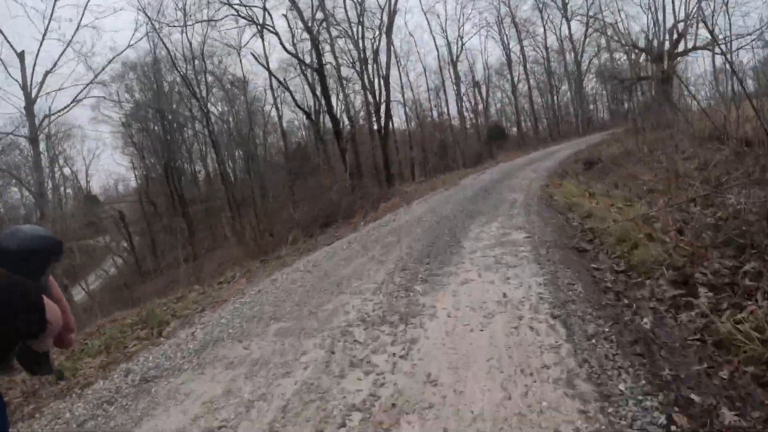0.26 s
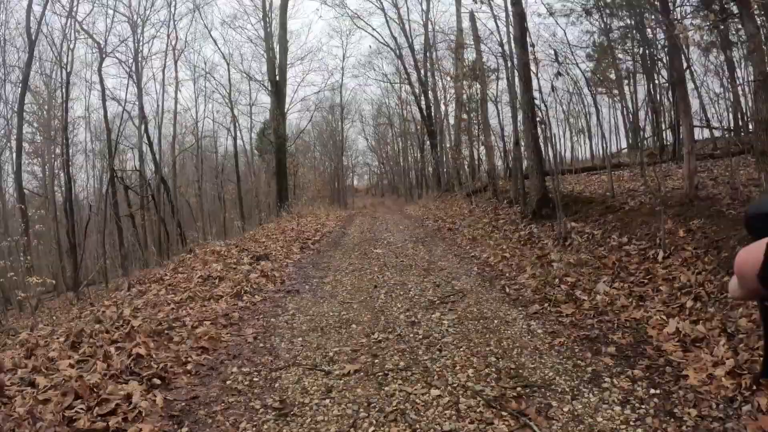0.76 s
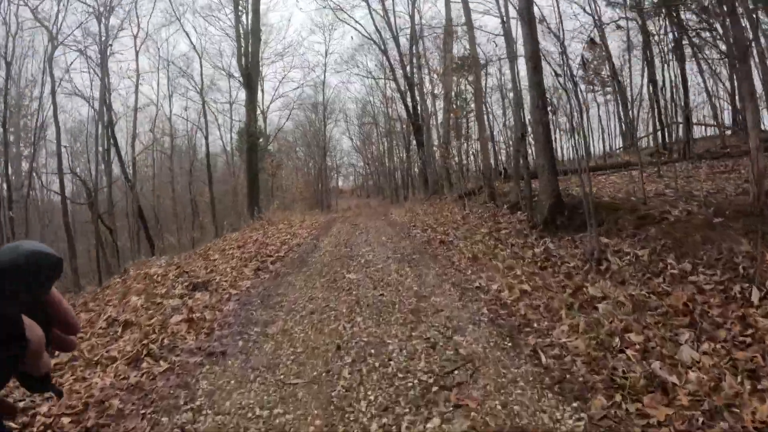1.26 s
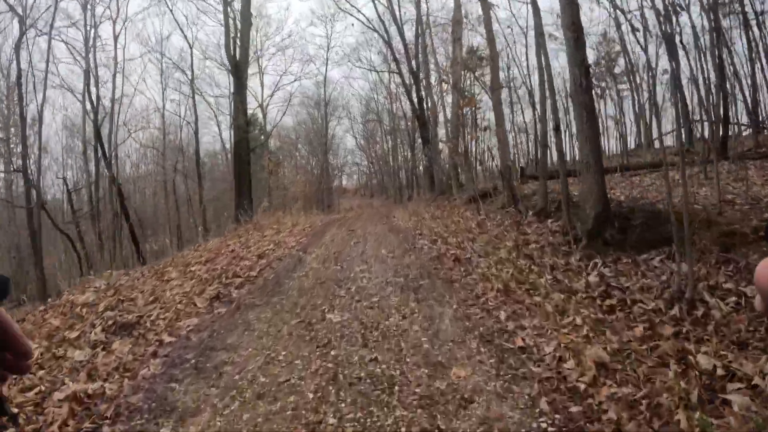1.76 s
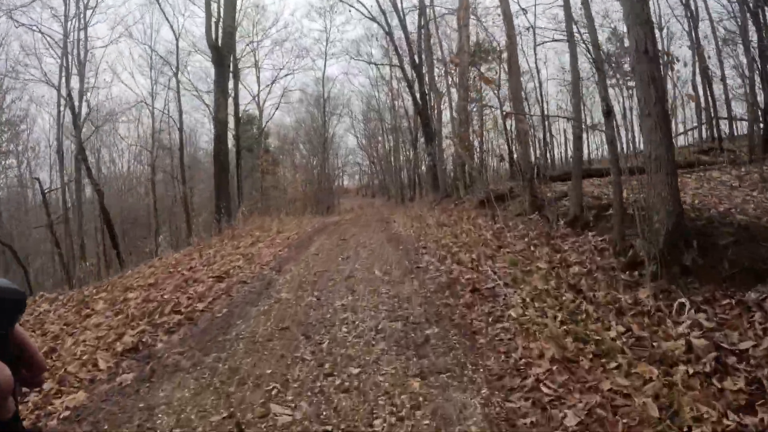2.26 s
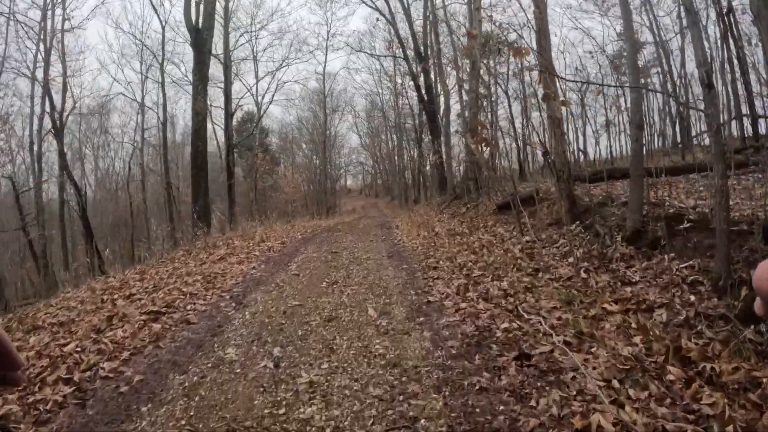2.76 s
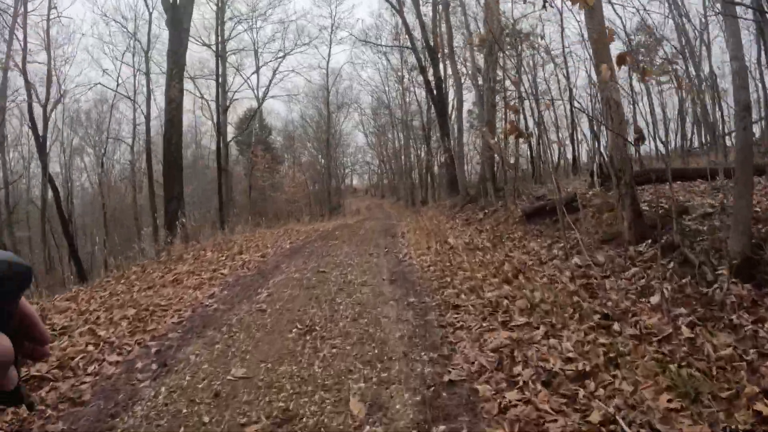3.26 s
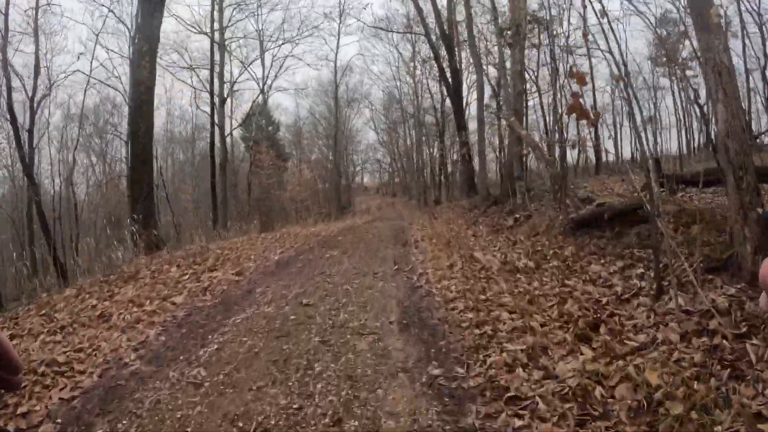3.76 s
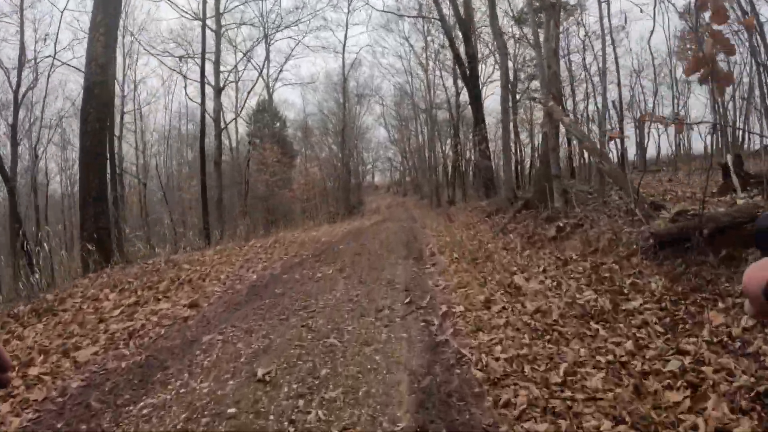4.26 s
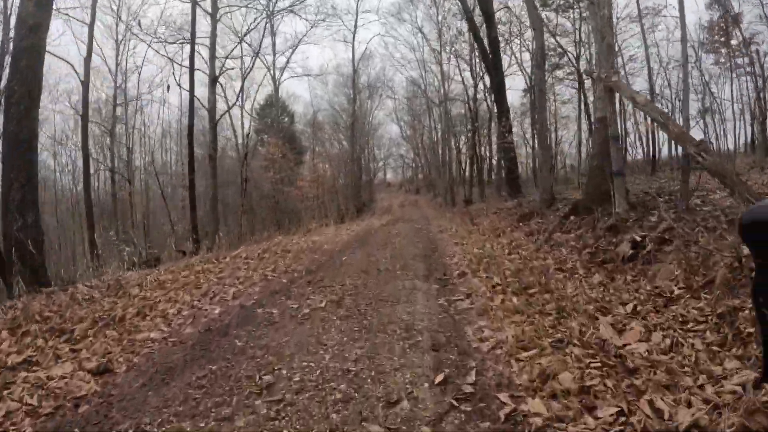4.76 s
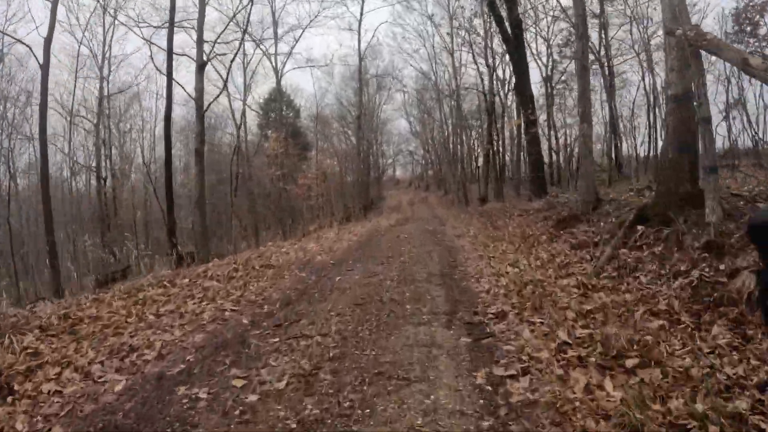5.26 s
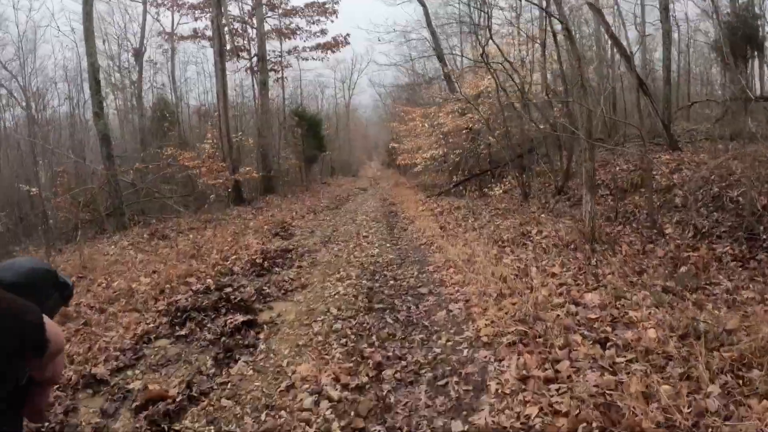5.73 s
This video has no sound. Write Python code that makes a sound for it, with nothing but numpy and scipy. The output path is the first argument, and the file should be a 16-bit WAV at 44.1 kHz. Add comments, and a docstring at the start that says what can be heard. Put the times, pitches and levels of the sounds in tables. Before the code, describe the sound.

Dense gritty rolling under bicycle tyres, harsher and more rattly at first, then softer, patchier and crackling as leaves cover the stones. Scattered sharp pops, clinks, brittle leaf ticks and a few dull thuds stand out, with a strong clack near 4.8 seconds. Wind buffets the nearby microphone in low, uneven swells in the open air, with no noticeable echo.

```python
"""Countless small stones grind and tick under bicycle tyres: noise and short damped tones shaped by the ground.
The wheels roll along a packed gravel road, then a woodland track of loose stones and dry leaves.
Stones pop away as cracks with ringing modes; bumps, judders and knocks are bell-shaped bursts; leaves snap.
Wind buffets the microphone that rides along: noise filtered into large and small eddies, driven by air speed."""
import sys
import numpy as np
from scipy import signal
from scipy.fft import rfft, irfft, next_fast_len
from scipy.io import wavfile
from scipy.ndimage import uniform_filter1d

SR = 44100
rng = np.random.default_rng(int(sys.argv[2]) if len(sys.argv) > 2 else 0)


def dump(signal):
    """Clip the signal to [-1, 1] and save it as 16-bit WAV at the path in sys.argv[1]."""
    limited = np.clip(np.atleast_2d(signal).T, -1, 1)
    pcm = np.round(limited * 32767).astype(np.int16)
    wavfile.write(sys.argv[1], SR, pcm)


N = 264467
T = np.arange(N) / SR
FFT_SIZE = next_fast_len(N)
FFT_HZ = np.fft.rfftfreq(FFT_SIZE, 1 / SR)

# Spectra of wind eddies, shaken frame, packed road and leafy track, then of a stone's crack with its grit,
# gravel crushed by a bump, and a snapping leaf. Each row: frequency in Hz, relative density in dB per Hz.
WIND_SPECTRUM = [(8, 5), (20, 6.5), (31, 4), (50, -6), (75, -6), (100, -13), (125, -8), (170, -22.5),
                 (260, -28), (600, -98.5), (2000, -86)]
FRAME_SPECTRUM = [(70, -38), (105, 5), (122, 3.5), (150, -0.5), (190, 1.5), (235, -3), (305, 0),
                  (400, -7.5), (570, -11.5), (750, -27.5), (1500, -42), (4000, -89)]
ROAD_SPECTRUM = [(400, 15.5), (620, 6.5), (850, 2), (1300, -1.5), (1800, -9.5), (2400, -6.5), (3300, -10),
                 (4500, -23.5), (6300, -33.5), (8500, -37), (10500, -48.5), (13000, -60), (16000, -89)]
TRACK_SPECTRUM = [(400, 1.5), (620, 6.5), (850, -0.5), (1300, 0), (1850, -10), (2800, -1.5), (3300, -4.5),
                  (4200, -14.5), (5500, -24.5), (7000, -28), (8400, -28.5), (9800, -35), (12800, -40.5),
                  (15500, -52)]
CRACK_SPECTRUM = [(150, -13), (400, -23), (1200, 15), (1900, -3.5), (2700, 14.5), (3400, 8), (5000, -28),
                  (8500, -16), (12000, -42), (16000, -73)]
CRUNCH_SPECTRUM = [(120, -22), (330, 19), (600, 5.5), (1250, 3.5), (2000, -5), (3200, -4.5), (5000, -17),
                   (8500, -26), (12000, -43), (16000, -68)]
LEAF_SPECTRUM = [(1500, -48), (4000, 16.5), (6500, 17), (8500, 7), (11000, 0), (15500, -15)]

# Air speed past the microphone. Each row: time in seconds, level in dB.
AIR_SPEED = [(0.0, -21), (0.23, -25.5), (0.5, -24), (0.8, -23.5), (1.4, -24.5), (1.9, -30), (2.8, -28),
             (3.5, -27.5), (4.7, -26.5), (5.3, -25.5), (6.0, -27.5)]
# Gusts and lulls of large eddies. Each row: centre in seconds, change in dB, half-width in seconds.
GUST_SWELLS = [(0.0, -2.5, 0.11), (0.42, 6, 0.22), (1.02, -1, 0.043), (1.25, -5, 0.029), (1.78, 10.5, 0.15),
               (2.05, 8, 0.066), (2.24, -2, 0.072), (2.33, 6.5, 0.077), (2.5, 6.5, 0.028),
               (2.87, -4, 0.031), (3.2, -6.5, 0.16), (3.45, 8.5, 0.093), (3.57, 4.5, 0.056),
               (3.7, -5, 0.054), (3.85, 3, 0.084), (4.5, -7.5, 0.14), (4.78, 2.5, 0.063),
               (4.96, -11, 0.067), (5.27, -3.5, 0.11), (5.87, 6.5, 0.17)]
# The ground under the tyres. Each row: time in seconds, stoniness in dB, loose cover of grit and leaves in dB.
GROUND_COVER = [(0.0, -37, -46), (0.18, -41, -54), (0.26, -37.5, -45.5), (0.37, -34, -42),
                (0.58, -38.5, -40), (0.7, -38.5, -46.5), (0.85, -38, -46.5), (1.12, -36.5, -44.5),
                (1.3, -42, -51.5), (1.6, -39.5, -49), (2.13, -44.5, -55.5), (2.17, -40, -47.5),
                (2.45, -43, -50), (2.7, -44.5, -48.5), (3.08, -45, -49), (3.75, -46.5, -50.5),
                (4.35, -49.5, -50), (4.65, -44.5, -46), (5.0, -49, -49), (5.55, -46.5, -48.5),
                (5.9, -41, -49.5)]
# The tread digs in. Each row: centre in seconds, lift in dB, half-width in seconds.
TREAD_SURGES = [(0.07, -0.5, 0.042), (0.435, 3.5, 0.014), (0.62, 1.5, 0.03), (1.42, 4, 0.094),
                (1.56, 2, 0.018), (1.79, 8.5, 0.051), (2.18, 4, .025), (2.28, 3, 0.038), (2.605, 4, 0.031),
                (3.05, 2.5, 0.046), (3.46, 1.5, 0.061), (3.86, 3, 0.0077), (4.8, 6, 0.022),
                (5.32, 3.5, 0.02), (5.73, 4, 0.024)]
# The tyres skim a smooth spot. Each row: centre in seconds, change in dB, half-width in seconds.
SMOOTH_SPOTS = [(0.783, -2.5, 0.014), (0.845, -2, 0.0091), (1.07, -5.5, 0.022), (1.725, -6, 0.017),
                (2.122, -6, 0.035), (4.27, -3.5, 0.036)]
# Ripples in the ground set the frame juddering.
# Each row: centre in seconds, level in dB, pitch in Hz, half-width in seconds.
FRAME_JUDDERS = [(0.11, -24.5, 73, .05), (0.235, -20, 74.6, 0.058), (0.33, -26.5, 81.6, 0.024),
                 (0.555, -21, 154, 0.01196), (0.41, -27, 145, 0.0203), (0.72, -28, 76, .07),
                 (0.829, -24.5, 131, 0.018), (1.2, -30.5, 79.6, .03), (2.061, -33, 130, 0.02),
                 (2.19, -37.5, 232, .015), (3.48, -36.5, 72, .08), (5.3, -29, 82, 0.057),
                 (5.64, -29, 109, .035), (5.85, -31, 69, .04)]
# Stones pinched out from under a tyre.
# Each row: start in seconds, ring level in dB, pitch in Hz, ring T60 in seconds, rise in seconds.
STONE_POPS = [(0.072, -29, 3400, 0.0045, .0002), (0.3384, -20.5, 2590, 0.0038, 0.0002),
              (0.3396, -29, 3640, 0.011, 0.0004), (0.3555, -19.5, 1000, 0.017, 0.0005),
              (.530, -26, 1060, 0.016, 0.00029), (0.748, -31, 1280, 0.0065, 0.00015),
              (0.821, -27, 1210, 0.0072, 0.00014), (0.867, -25.5, 1010, 0.0021, 0.00009),
              (0.981, -33, 1900, .004, 0.00022), (0.9891, -24, 2000, 0.0042, 0.00015),
              (1.023, -32, 1490, .004, 0.00018), (1.1172, -29, 755, 0.011, 0.0003),
              (1.2485, -32, 686, 0.015, 0.00058), (1.403, -32, 2140, 0.03, 0.00051),
              (1.451, -37, 1040, .004, 0.00024), (1.593, -33, 1330, 0.0031, 0.00013),
              (1.6919, -27, 840, 0.013, 0.00098), (1.87, -34, 660, 0.021, 0.00042),
              (2.3008, -38, 556, 0.02, 0.00061), (2.504, -32.5, 2610, 0.006, 0.0002),
              (2.509, -36, 2700, 0.014, 0.0002), (2.610, -34, 2680, 0.013, 0.00026),
              (2.722, -33, 950, .012, .0007), (2.774, -38, 2700, .008, .0003),
              (2.827, -40, 2900, .006, .0003), (2.849, -40, 2500, .006, .0003),
              (2.9075, -32.5, 756, 0.009, 0.00023), (3.002, -37, 2780, 0.018, 0.00034),
              (3.030, -37, 2720, 0.018, 0.00033), (3.064, -36, 2600, .008, .0003),
              (3.157, -32, 640, .016, .0008), (3.223, -36.5, 2820, .007, .0003),
              (3.387, -36, 950, .009, .0004), (3.505, -37, 2680, .01, .0003),
              (3.571, -35.5, 2600, .006, .0002), (3.59, -32, 1100, .007, .0004),
              (3.653, -28, 2550, 0.0083, .0002), (3.6792, -45, 2900, .006, .0003),
              (3.680, -24, 930, 0.016, 0.00053), (3.687, -31, 750, .012, 0.00083),
              (3.701, -49, 3000, .008, .0003), (3.877, -46, 2780, .006, .0003),
              (3.914, -31, 1020, 0.0018, 0.00014), (4.046, -27.5, 1090, 0.0046, 0.000057),
              (4.2094, -31.5, 1000, 0.009, 0.00016), (4.492, -25.5, 1050, 0.0039, 0.000091),
              (4.4933, -31, 2700, .006, .0002), (4.506, -43, 1300, .005, .0002),
              (4.659, -37, 3120, 0.0055, .0002), (4.7772, -34.5, 1130, 0.0066, 0.00018),
              (4.778, -31, 2430, .008, 0.00034), (4.779, -20.5, 1120, 0.021, 0.001),
              (4.788, -27, 1080, 0.013, .0007), (4.8223, -24, 2720, 0.0063, 0.00032),
              (4.999, -40, 1100, 0.0086, .0004), (5.053, -38, 2780, .008, .0003),
              (5.322, -38, 2920, 0.0089, .0003), (5.4542, -31, 2790, 0.0081, .00026),
              (5.532, -40, 990, 0.0076, 0.00044), (5.632, -34.5, 2520, 0.0072, 0.00027),
              (5.743, -37, 2750, 0.0098, .0003), (5.7985, -26, 1115, 0.015, 0.0012),
              (5.9018, -27.5, 1307, 0.019, 0.0016), (5.9054, -21.5, 1330, 0.0074, 0.0012),
              (5.9676, -31.5, 1800, 0.0041, 0.0003)]
# Stones rolled over against their neighbours.
# Each row: centre in seconds, level in dB, pitch in Hz, half-width in seconds.
STONE_RATTLES = [(0.4, -47, 2100, .1), (0.533, -27, 510, 0.0064), (0.55, -38, 2230, 0.013),
                 (0.61, -48, 2160, 0.032), (1.148, -37, 674, 0.011), (1.556, -36.5, 530, 0.0065),
                 (1.57, -47, 2800, 0.017), (1.66, -49, 2900, 0.028), (1.795, -45.5, 2250, 0.021),
                 (2.303, -43, 590, .007), (2.303, -41.5, 1200, 0.007), (2.597, -37, 455, 0.0071),
                 (2.61, -44, 900, 0.0055), (2.919, -41, 920, 0.0051), (3.05, -52, 2700, 0.031),
                 (3.698, -50, 1200, 0.0057), (3.86, -54, 2780, .025), (4.793, -47, 1260, 0.0036),
                 (5.724, -49, 1000, .014), (5.8, -34, 1100, 0.0082), (5.807, -39, 590, 0.0039),
                 (5.87, -51, 2770, 0.029), (5.9065, -36, 1400, 0.0071)]
# The tyre scrubs over the ground, a soft low rubbing.
# Each row: centre in seconds, level in dB, half-width in seconds.
TYRE_SCUFFS = [(0.653, -40.5, 0.14), (4.615, -47, 0.13)]
# Bumps that crush a patch of gravel. Each row: centre in seconds, level in dB, half-width in seconds.
GRAVEL_BUMPS = [(0.53, -37, 0.0048), (0.548, -25, 0.012), (0.576, -26, 0.014), (0.723, -28.5, 0.0059),
                (0.749, -31.5, 0.014), (0.801, -32, 0.0043), (0.818, -30, 0.0094), (1.121, -31, 0.0085),
                (1.394, -41, 0.013), (1.747, -44, 0.0048), (1.766, -38, 0.0046), (1.784, -36, 0.005),
                (1.806, -35, .005), (2.25, -40, .008), (2.297, -35, 0.012), (2.543, -38, 0.0053),
                (2.922, -45.5, 0.0086), (4.494, -35.5, 0.0092), (5.734, -38.5, 0.0065),
                (5.795, -37.5, 0.017)]
# Dull knocks of the bike and gusts striking the microphone.
# Each row: centre in seconds, peak in dB, pitch in Hz, half-width in seconds.
DULL_THUDS = [(0.548, -16, 322, 0.0027), (1.182, -22, 320, 0.0041), (1.785, -21.5, 270, 0.0044),
              (2.147, -20.5, 298, 0.0036), (2.304, -25, 497, 0.004), (4.505, -32, 304, 0.0049),
              (4.918, -34, 250, 0.0053), (5.085, -10.5, 50, 0.011)]
# Dry leaves breaking under the tread. Each row: start in seconds, level in dB, fade constant in seconds.
LEAF_BREAKS = [(0.747, -39, 0.0019), (0.815, -50, 0.0056), (0.866, -44, 0.003), (0.891, -46, 0.0027),
               (0.919, -43, 0.0027), (0.961, -55, .003), (0.9798, -45, .0034), (1.023, -47, 0.0029),
               (1.448, -47, 0.0028), (1.5936, -47, .0034), (1.81, -45, 0.0031), (2.033, -55, .02),
               (2.304, -42, .0034), (2.7776, -52, .0034), (3.473, -51, .0034)]

TRACK_FROM_S, LEAFY_FADE_S = 0.75, 0.074  # the packed road gives way to the leafy track
LITTER_DEEP_S = 2.4  # by now the leaves lie thick enough to cushion the stones
FLUTTER_POWER, FLUTTER_DB = 2.08, 18.5  # small eddies grow faster with air speed than large ones
FLUTTER_GUST = 0.19  # share of each gust, in dB, that reaches the small eddies
DRUM_POWER, DRUM_DB = 0.58, -13.5  # the tyres soften knocks: drumming grows slower than stoniness
ROAD_DRUM_DB, ROAD_END_S, ROAD_FADE_S = 6, 0.83, 0.11  # the hard road shakes the frame more
STONE_DB, GRIT_DB = -2.38, -7.5
LEAF_POWER, LEAF_DB = 0.77, -22.5  # leaf crackle grows slower than the loose cover
DEEP_GRIT_DB, DEEP_LEAF_DB = 1, -2  # deep litter crunches more and hisses less
ROAD_CLUMPING = 0.26  # packed ground gives way more evenly than loose stones
CHIP_HZ, CHIP_T60_S = 2650, 0.011  # middle pitch and ring of the small loose stones
CLACK_HZ, CLACK_T60_S = 1040, 0.014  # and of the larger ones
BAND_LIMIT_HZ = 15600


def amp(db):
    """Decibel law: level to amplitude gain."""
    return 10 ** (np.asarray(db) / 20)


def evened(x):
    """Normalisation to unit rms."""
    return x / np.sqrt(np.mean(x ** 2) + 1e-20)


def level(rows, axis=1):
    """Linear interpolation in dB of one column, as a gain for every sample."""
    columns = np.transpose(rows)
    return amp(np.interp(T, columns[0], columns[axis]))


def bell(centre_s, length_s):
    """Gaussian envelope: a smooth swell and decay."""
    return np.exp(-((T - centre_s) / length_s) ** 2)


def bursts(rows):
    """Superposition of Gaussian bursts, each at its own level."""
    return sum(amp(db) * bell(s, length) for s, db, length in rows)


def swells(rows):
    """Gaussian lifts or dips in dB, as a gain for every sample."""
    return amp(sum(db * bell(s, length) for s, db, length in rows))


def add(mix, s, sound):
    """Superposition: mixes a sound in at time s."""
    part = mix[max(round(s * SR), 0):][:len(sound)]
    part += sound[:len(part)]


def colour(x, points, size=8192):
    """Minimum-phase filtering to a given spectrum, so that clicks keep their sharp front; rms 1."""
    hz, db = np.transpose(points)
    log_hz = np.log(abs(np.fft.fftfreq(size, 1 / SR)) + 1)
    log_gain = np.log(amp(np.interp(log_hz, np.log(hz), db)))
    # the Hilbert transform of the log gain is the phase of a causal filter
    response = np.exp(np.conj(signal.hilbert(log_gain)))
    taps = np.fft.ifft(response).real[:size // 2]
    return evened(signal.oaconvolve(x, taps)[:N])


def band(x, lo_hz, hi_hz, order=8):
    """Band-pass by a difference of low-passes, so that neighbours join without a gap; rms 1."""
    gain = 1 / (1 + (FFT_HZ / hi_hz) ** order) - 1 / (1 + (FFT_HZ / lo_hz) ** order)
    return evened(irfft(rfft(x, FFT_SIZE) * gain, FFT_SIZE)[:N])


def wander(lo_hz, hi_hz):
    """Slow random modulation: noise confined between two rates, rms 1."""
    gain = FFT_HZ ** 2 / (FFT_HZ ** 2 + lo_hz ** 2) / (1 + (FFT_HZ / hi_hz) ** 2)
    noise = rng.standard_normal(FFT_SIZE)
    return evened(irfft(rfft(noise) * gain, FFT_SIZE)[:N])


def clicks(per_s, spread_db):
    """Random impulses of either sign: independent contacts with exponentially spread levels."""
    size = amp(spread_db * np.minimum(rng.exponential(1, N), 4.5))
    return size * rng.choice([-1., 1.], N) * (rng.random(N) < per_s / SR)


def pebbles(per_s, spread_db, cycles, count=22, size=1024):
    """Size scaling of stones: small ones tick higher and more often; white on average."""
    t, out = T[:size], np.zeros(N)
    for hz in np.geomspace(450, 14000, count):
        tick = np.sin(2 * np.pi * hz * t) * np.exp(-hz * t / cycles)
        contacts = clicks(per_s / count * np.sqrt(hz / 2000), spread_db)
        out += np.sqrt(hz) * evened(signal.oaconvolve(contacts, tick)[:N])
    return evened(out)


def crumbling(per_s, spread_db, fade_s, steady):
    """Sudden yielding and relaxation: sharp rises and short fades over steady rolling."""
    decay = np.exp(-1 / (fade_s * SR))
    slips = signal.lfilter([1], [1, -decay], clicks(per_s, spread_db) ** 2)
    power = steady + slips / slips.mean()
    return np.sqrt(power / uniform_filter1d(power, size=6000))


def bite():
    """Amplitude modulation by how hard the tread works the ground."""
    return swells(TREAD_SURGES) * swells(SMOOTH_SPOTS)


def gravel():
    """Granular friction: ticking pebbles, sharp snaps and fine grinding, in clumps as the tread bites."""
    ticks = pebbles(per_s=2400, spread_db=2.5, cycles=1.4)
    snaps = evened(clicks(per_s=500, spread_db=0.5))
    grinding = rng.standard_normal(N)
    leafy = np.clip(.5 + (T - TRACK_FROM_S) / LEAFY_FADE_S, 0, 1)
    cushioned = np.clip((T - TRACK_FROM_S) / (LITTER_DEEP_S - TRACK_FROM_S), 0, 1)
    clumps = crumbling(per_s=140, spread_db=3.0, fade_s=0.0094, steady=1.23)
    clumps = clumps ** (ROAD_CLUMPING + (1 - ROAD_CLUMPING) * leafy)
    coarse = (ticks + amp(0.5) * snaps + amp(7.0) * grinding) * clumps
    fine = (ticks + amp(-5) * snaps + amp(11.0) * grinding) * clumps  # crumbs are too many to tell apart

    def part(crush, lo_hz, hi_hz, litter):
        """Crossfade of one size class from bare road (litter 0) to leaf-covered track (1)."""
        road = band(colour(crush, ROAD_SPECTRUM), lo_hz, hi_hz)
        track = band(colour(crush, TRACK_SPECTRUM), lo_hz, hi_hz)
        return (1 - litter) * road + litter * track

    stony = level(GROUND_COVER, axis=1) * bite()
    loose = level(GROUND_COVER, axis=2) * bite()
    deep = T > LITTER_DEEP_S
    patchy = amp(1.3 * leafy * wander(4.4, 35))  # grit lies in patches on the track
    crackle = crumbling(per_s=72, spread_db=1.0, fade_s=0.0026, steady=1.9)  # chips stand out of the grit

    stones = part(coarse, 470, 2285, cushioned) * stony * amp(STONE_DB)
    grit = part(coarse * crackle, 1890, 5600, cushioned) * loose * patchy
    grit *= amp(GRIT_DB + DEEP_GRIT_DB * deep)
    leaves = part(fine, 4330, 22000, leafy) * loose ** LEAF_POWER
    leaves *= amp(LEAF_DB + DEEP_LEAF_DB * deep)
    return stones + grit + leaves


def wind():
    """Turbulence at the microphone: large eddies buffet, small ones flutter."""
    eddies = colour(rng.standard_normal(N), WIND_SPECTRUM)

    def stream(lo_hz, hi_hz):
        """Local power normalisation: eddies of one size, of even strength until a gust drives them."""
        x = band(eddies, lo_hz, hi_hz)
        return x / np.sqrt(uniform_filter1d(x ** 2, size=12000))

    air, gusts = level(AIR_SPEED), swells(GUST_SWELLS)
    buffeting = air * gusts * stream(8, 55)
    flutter = air ** FLUTTER_POWER * gusts ** FLUTTER_GUST * stream(55, 2000)
    return buffeting + amp(FLUTTER_DB) * flutter


def drumming():
    """Forced vibration: stones knock on the tyre casings and shake the frame."""
    knocks = evened(clicks(per_s=500, spread_db=4.5)) + 0.78 * rng.standard_normal(N)
    uneven_knocks = knocks * amp(1.47 * wander(25, 30))
    hard = np.clip(.5 - (T - ROAD_END_S) / ROAD_FADE_S, 0, 1)
    force = (level(GROUND_COVER, axis=1) * bite()) ** DRUM_POWER
    return force * amp(DRUM_DB + ROAD_DRUM_DB * hard) * colour(uneven_knocks, FRAME_SPECTRUM)


def chips(chip_db=-16, ring_db=-12.0, clack_db=-15, count=9, size=1024):
    """Impact and free vibration: small stones flick away with a crack; on the track stones clink and clack."""
    cracks = colour(clicks(per_s=24, spread_db=0.0), CRACK_SPECTRUM)
    t = T[:size]

    def collisions(middle_hz, t60, per_s, spread_db):
        """Damped oscillation: random short rings of stones of about one size."""
        out = np.zeros(N)
        for hz in middle_hz * np.geomspace(.72, 1.35, count):
            ring = np.sin(2 * np.pi * hz * t) * amp(-60 * t / t60)
            out += signal.oaconvolve(clicks(per_s / count, spread_db), ring)[:N]
        return evened(out)

    clinks = amp(ring_db) * collisions(CHIP_HZ, CHIP_T60_S, per_s=70, spread_db=2.5)
    clacks = amp(clack_db) * collisions(CLACK_HZ, CLACK_T60_S, per_s=65, spread_db=3.0)
    stones = amp(chip_db) * cracks + (clinks + clacks) * (T > TRACK_FROM_S)
    return stones * level(GROUND_COVER, axis=2) * bite()


def swelling(rows):
    """Narrow-band noise in Gaussian bursts, each around its own pitch."""
    out = np.zeros(N)
    for s, db, hz, length in rows:
        t = np.arange(-3 * length, 3 * length, 1 / SR)
        near_pitch = signal.butter(3, [.82 * hz, 1.22 * hz], "band", fs=SR, output="sos")
        noise = signal.sosfilt(near_pitch, rng.standard_normal(32768))
        shake = signal.hilbert(noise)[4096:][:len(t)]  # past the filter's onset
        shake = evened((shake / np.sqrt(abs(shake) + 1e-12)).real)  # flattens the noise's own beating
        burst = amp(db) * shake * np.exp(-(t / length) ** 2)
        start = s + t[0]
        add(out, start, burst[max(round(-start * SR), 0):])
    return out


def judders():
    """Forced vibration of the frame as the wheels cross ripples in the ground."""
    return swelling(FRAME_JUDDERS)


def pops(crack_db=-4, scatter_db=-22, scatter_t60=0.14, rattle_db=-23.0, rattle_t60=0.18,
         overtone=1.23, overtone_db=-8, undertone=0.55, undertone_db=-18, size=4096):
    """Sudden release: a stone snaps free, rings in its modes, rattles on its neighbours and scatters grit."""
    t, out = T[:size], np.zeros(N)
    crack = colour(signal.unit_impulse(N), CRACK_SPECTRUM)[:size]
    crack /= abs(crack).max()
    for s, db, hz, t60, rise in STONE_POPS:
        shape = (1 - np.exp(-(t / rise) ** 2)) * amp(-60 * t / t60)
        modes = np.sin(2 * np.pi * hz * t)
        modes += amp(overtone_db) * np.sin(2 * np.pi * overtone * hz * t)
        modes += amp(undertone_db) * np.sin(2 * np.pi * undertone * hz * t)
        ring = shape / shape.max() * modes

        near_pitch = signal.butter(2, [.75 * hz, 1.4 * hz], "band", fs=SR)
        rattle = evened(signal.lfilter(*near_pitch, rng.standard_normal(size)))
        rattle *= amp(rattle_db - 60 * t / rattle_t60)

        scatter = evened(signal.fftconvolve(rng.standard_normal(size), crack)[:size])
        scatter *= amp(scatter_db - 60 * t / scatter_t60)

        hardness = 1 / (1 + (rise / 0.00064) ** 2)  # a slow release hardly cracks
        add(out, s, amp(db) * (ring + rattle + hardness * (amp(crack_db) * crack + scatter)))
    return out


def rattles():
    """Repeated collision: stones rattle against their neighbours as they are rolled over."""
    return swelling(STONE_RATTLES)


def scuffs():
    """Friction and resonance: the tread drags over small stones with a hollow hum of the tyre casing."""
    drag = clicks(per_s=1500, spread_db=1)
    return band(drag, lo_hz=433, hi_hz=586) * bursts(TYRE_SCUFFS)


def bumps():
    """Simultaneous fracture: the tyre lands on a patch of gravel and crushes it all at once."""
    ticks = pebbles(per_s=3500, spread_db=-20.5, cycles=2.4)
    snaps = evened(clicks(per_s=500, spread_db=-3.0))
    return colour(ticks + snaps, CRUNCH_SPECTRUM) * bursts(GRAVEL_BUMPS)


def thuds():
    """Heavily damped vibration: a few low cycles that swell and die."""
    out = np.zeros(N)
    for s, db, hz, length in DULL_THUDS:
        out += amp(db) * bell(s, length) * np.cos(2 * np.pi * hz * (T - s))
    return out


def leaf_snaps(size=4096):
    """Brittle fracture: a leaf breaks in one thin, bright tick of decaying noise."""
    envelope = np.zeros(N)
    for s, db, fade_s in LEAF_BREAKS:
        add(envelope, s, amp(db) * np.exp(-T[:size] / fade_s))
    return envelope * colour(rng.standard_normal(N), LEAF_SPECTRUM)


def scene():
    """Superposition at one microphone, close by in the open air."""
    ground = gravel() + chips() + pops() + rattles() + scuffs() + bumps() + leaf_snaps()
    bike = drumming() + judders()
    return (ground + bike + wind() + thuds())[None]


def record(dry):
    """Linear-phase low-pass filtering: the microphone's band limit, with soft ends."""
    soft_ends = signal.windows.tukey(N, .001)
    low_pass = signal.firwin(511, BAND_LIMIT_HZ, window=("kaiser", 9), fs=SR)
    return signal.oaconvolve(dry * soft_ends, low_pass[None], "same")


dry = scene()
out = record(dry)
dump(out)
```